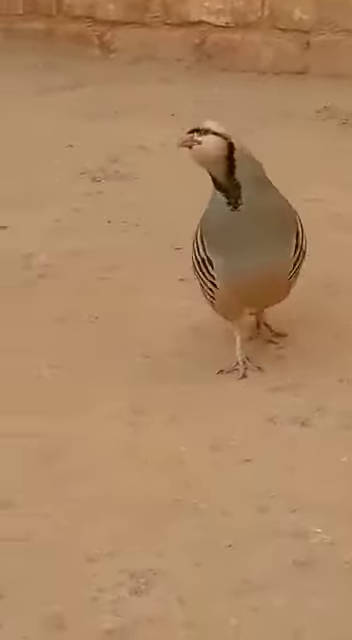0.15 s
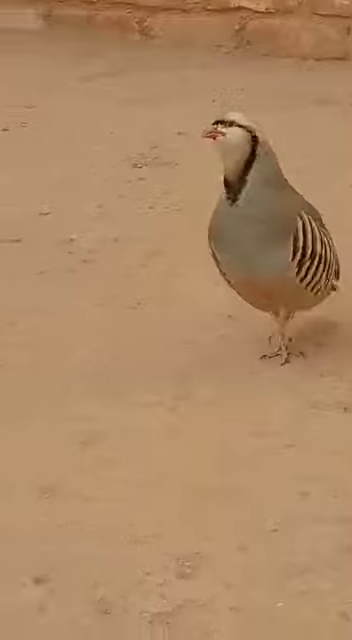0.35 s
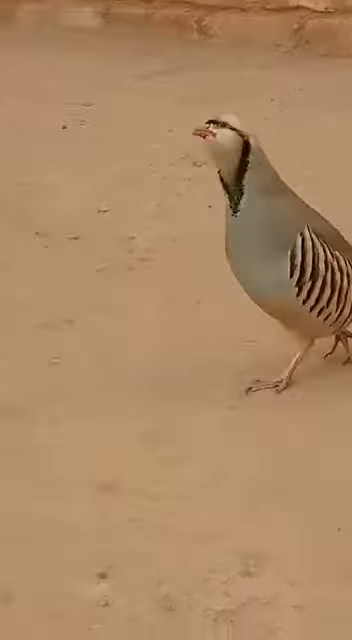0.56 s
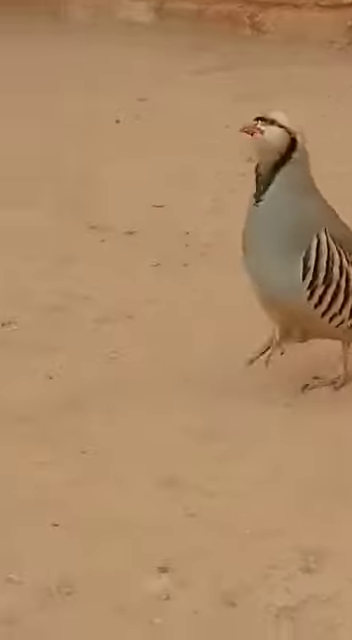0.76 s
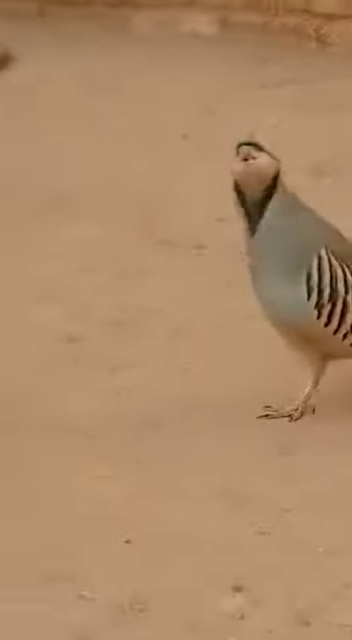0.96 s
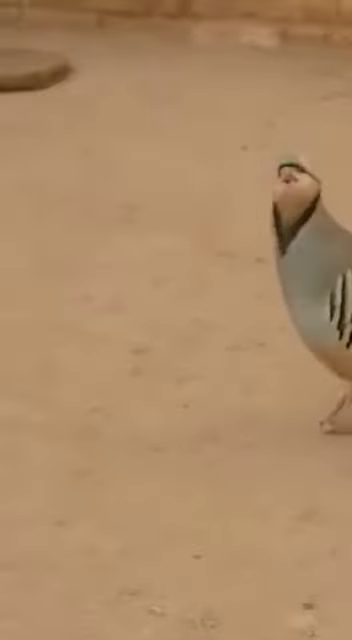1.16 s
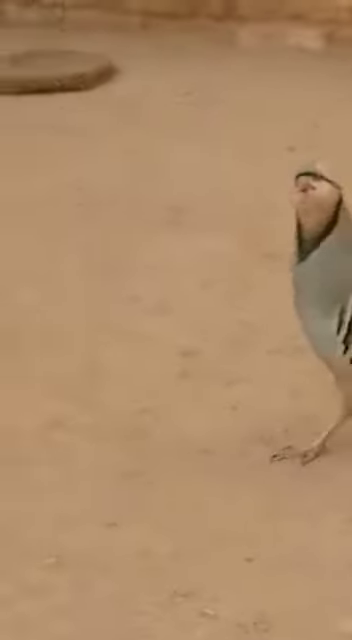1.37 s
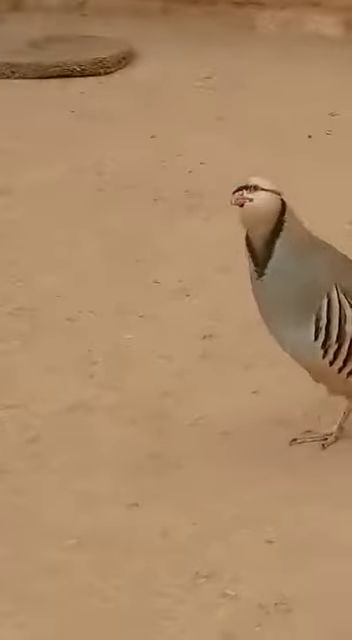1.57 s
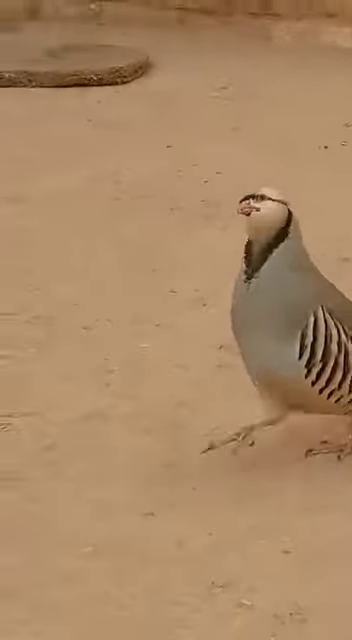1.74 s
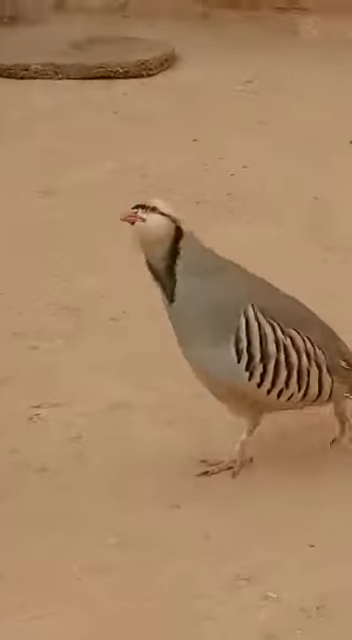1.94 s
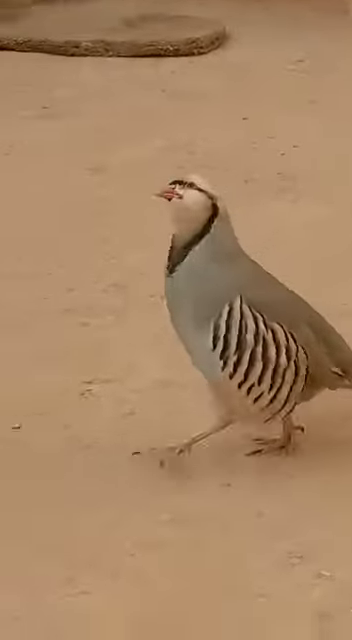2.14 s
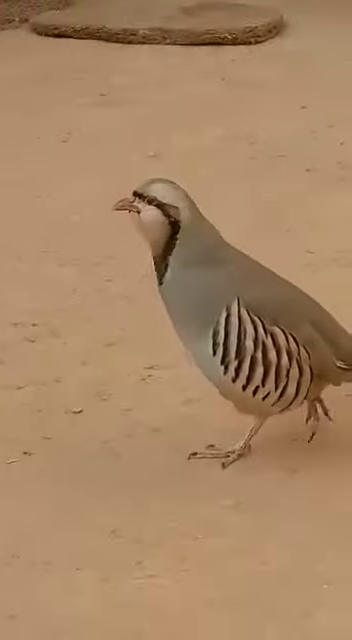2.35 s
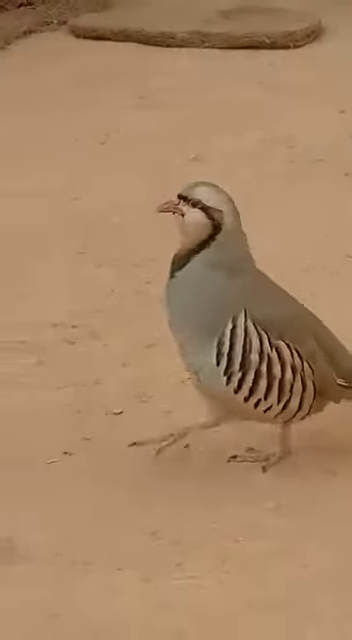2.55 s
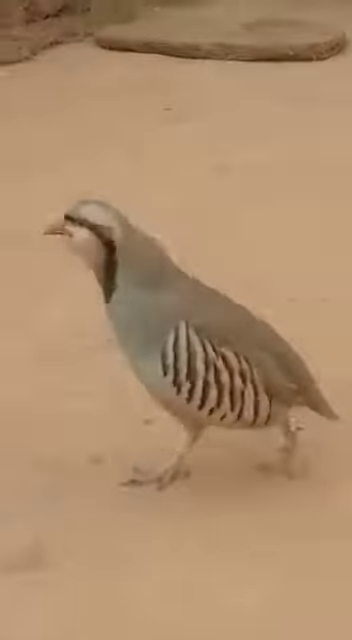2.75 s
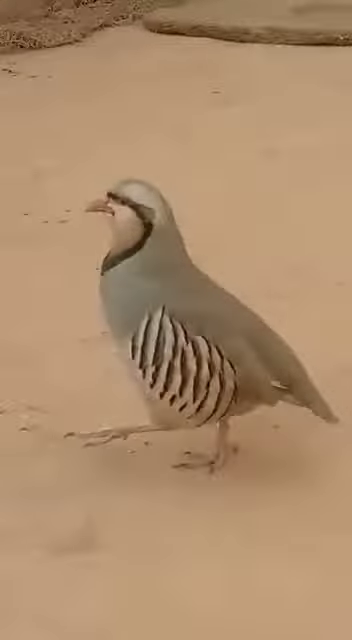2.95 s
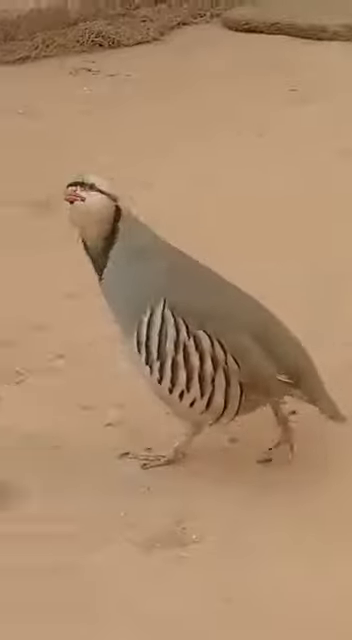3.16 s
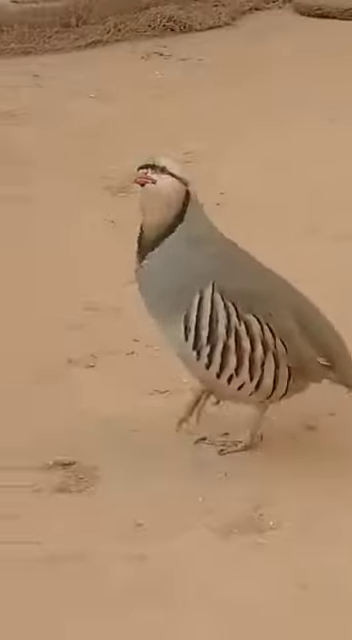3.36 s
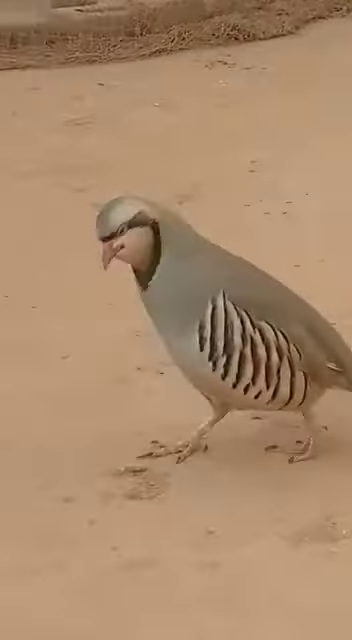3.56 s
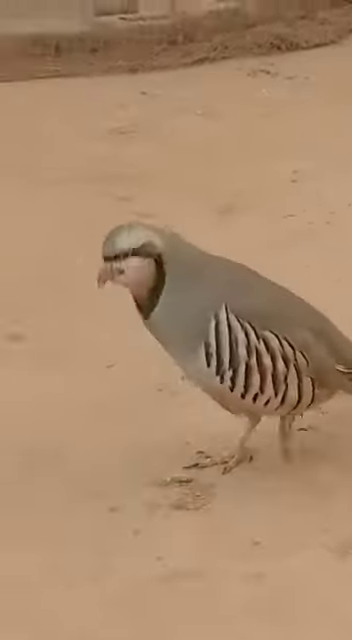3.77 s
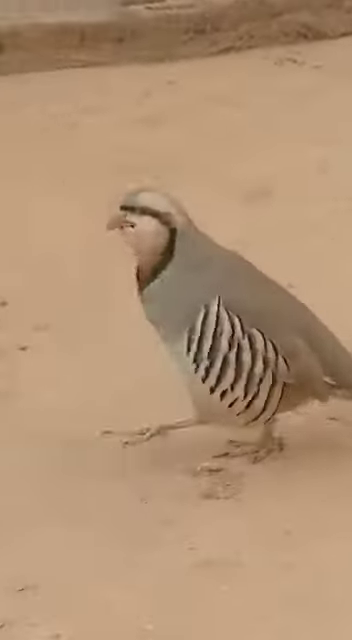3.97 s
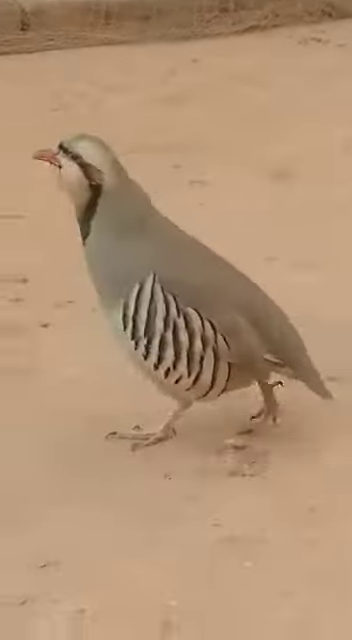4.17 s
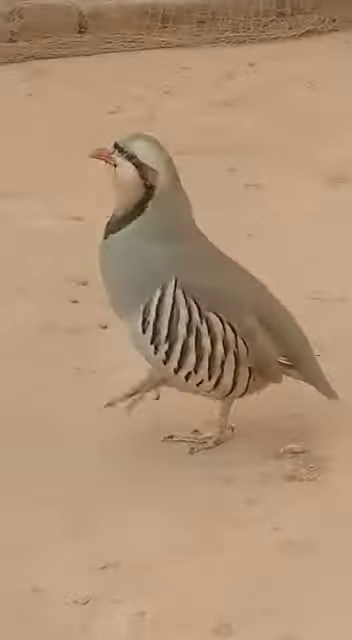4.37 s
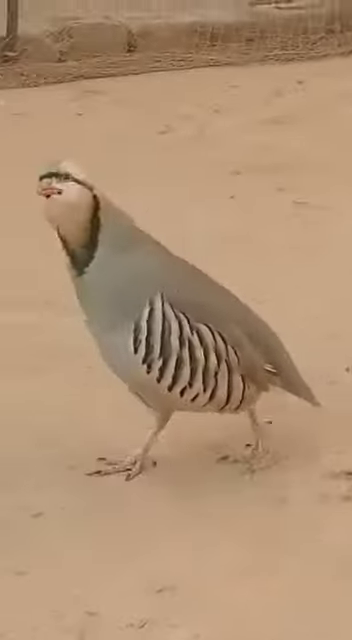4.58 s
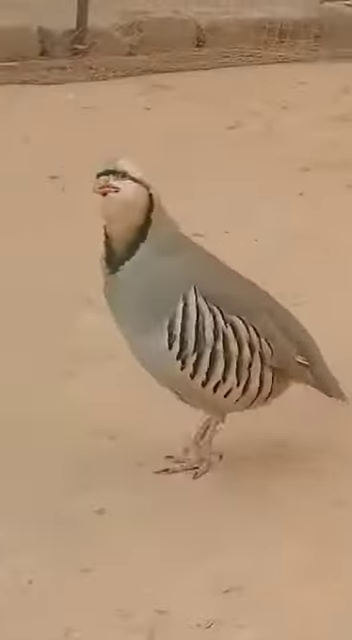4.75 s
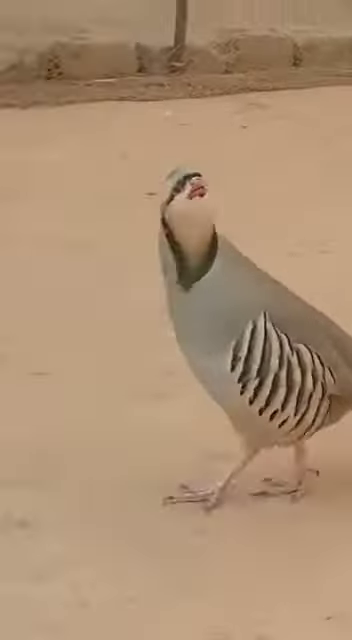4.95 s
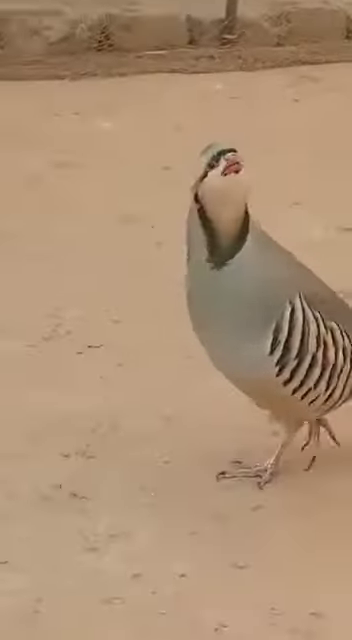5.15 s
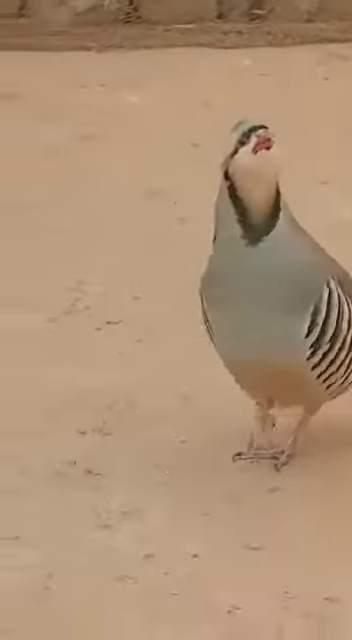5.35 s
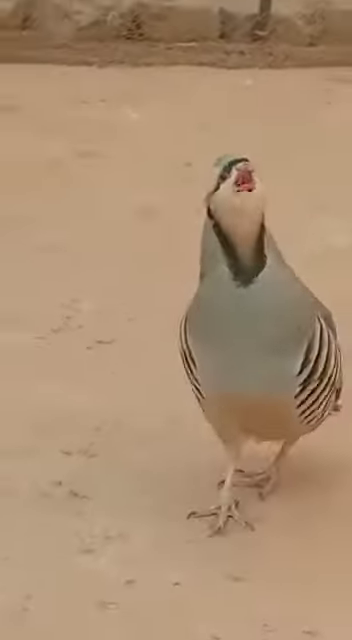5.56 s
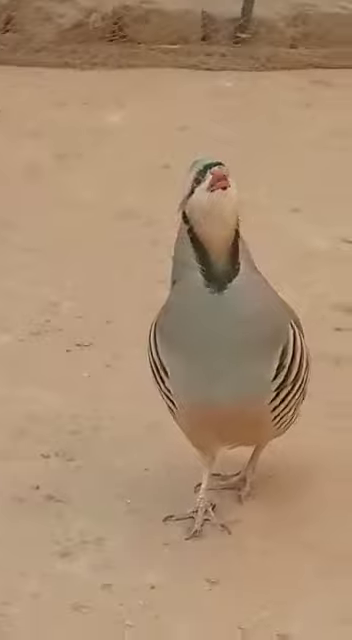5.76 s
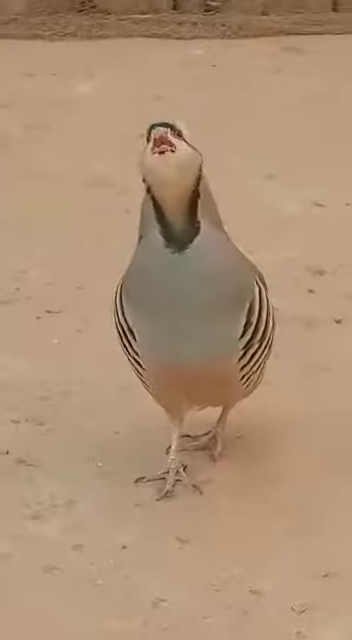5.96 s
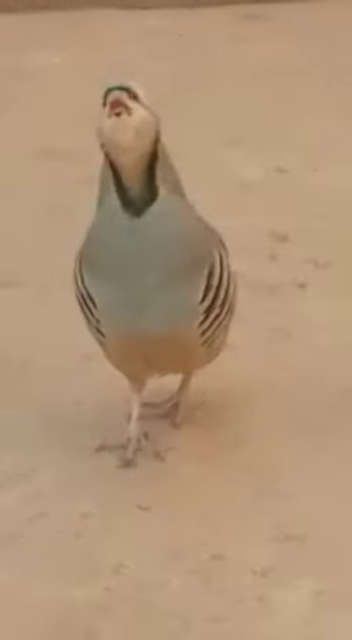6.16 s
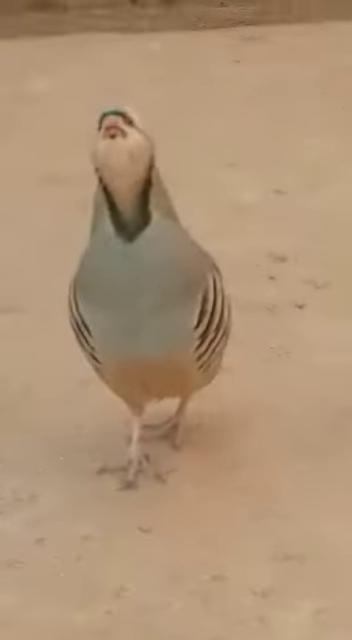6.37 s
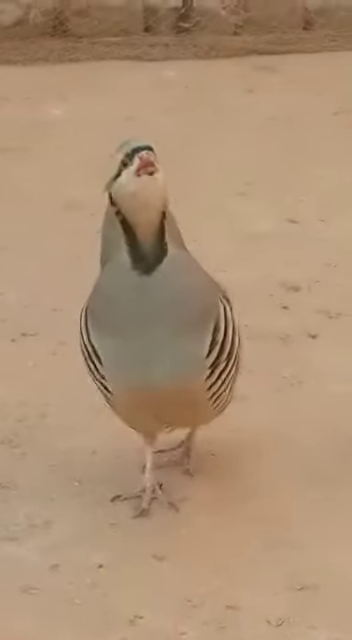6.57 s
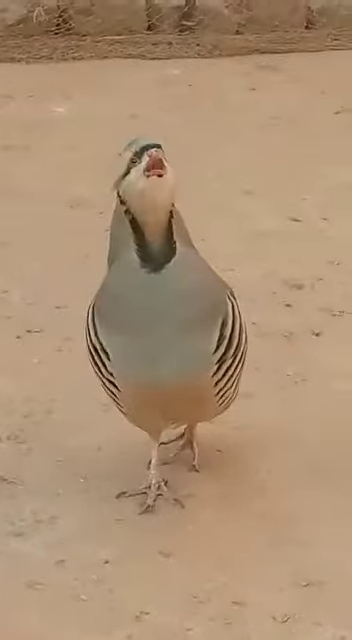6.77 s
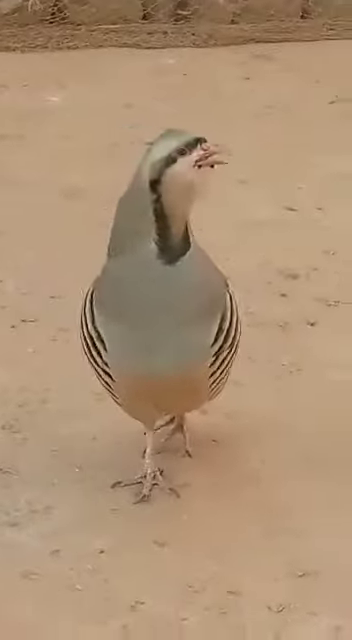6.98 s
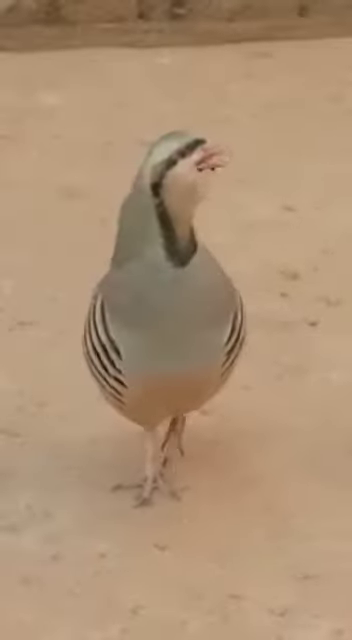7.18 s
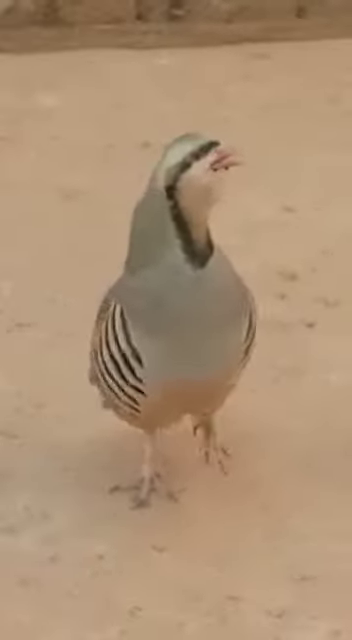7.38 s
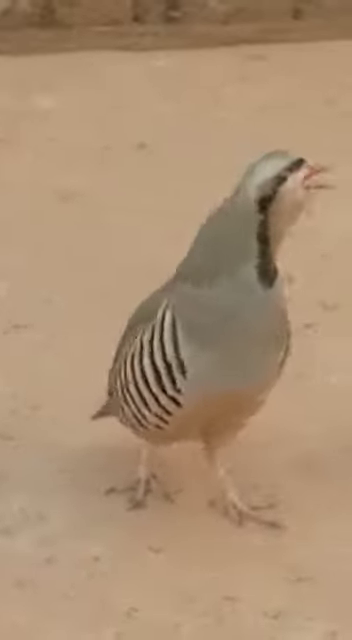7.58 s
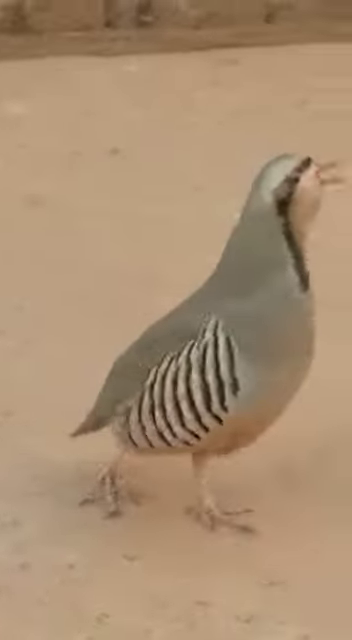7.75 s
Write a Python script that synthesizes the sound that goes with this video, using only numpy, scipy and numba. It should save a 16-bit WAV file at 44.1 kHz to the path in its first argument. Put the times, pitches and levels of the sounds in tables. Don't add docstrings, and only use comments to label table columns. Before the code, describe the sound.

Rasping bird squawks give way to sparse sharp clucks that quicken into a loud, harsh volley, with flockmates peeping and clucking farther off.

```python
import sys
import numpy as np
from scipy import signal
from scipy.io import wavfile
from scipy.ndimage import uniform_filter1d
from numba import njit

SR = 44100
rng = np.random.default_rng(int(sys.argv[2]) if len(sys.argv) > 2 else 0)


def level_to_linear(level):
    exponent = np.asarray(level, float) / 20
    return 10 ** exponent


def wav_out(sig):
    wavfile.write(sys.argv[1], SR, np.round(np.clip(np.atleast_2d(sig).T, -1, 1) * 32767).astype(np.int16))


N = 344862


def level(x, db):
    return x * level_to_linear(db) / np.sqrt(np.mean(x ** 2) + 1e-20)


@njit
def svf(x, hz, width):
    y, b, l, g, k, last = np.empty(len(x)), 0., 0., 0., 0., 0.
    for i in range(len(x)):
        if hz[i] != last:
            g, k, last = np.tan(np.pi * hz[i] / SR), width / hz[i], hz[i]
        v = (b + g * (x[i] - l)) / (1 + g * (g + k))
        b, l, y[i] = 2 * v - b, l + 2 * g * v, k * v
    return y


def ring(x, hz, width, count=2):
    for _ in range(count):
        x = svf(x, hz + np.zeros(len(x)), 1. * width)
    return x


def add(out, x, s):
    i = int(s * SR)
    out[i:i + len(x)] += x[:N - i]


def read(table, s):
    return [np.interp(s, np.array(table)[:, 0], c) for c in np.transpose(table)[1:]]


def section(table, fade):
    s, *columns = np.transpose(table)
    t = np.arange(s[0] - fade, s[-1] + fade, 1 / SR)
    edge = np.clip(np.minimum(t - t[0], t[-1] - t) / (2 * fade), 0, 1)
    return t[0], edge, [np.interp(t, s, c) for c in columns]


def notes(table, shape):
    share, start_db, end_db = shape
    share = np.clip(share, .05, .95)
    rows = []
    for s, length, db, start_hz, end_hz in table:
        peak_hz = start_hz + share * (end_hz - start_hz)
        rows.append([(s, start_hz, db + start_db),
                     (s + share * length, peak_hz, db),
                     (s + length, end_hz, db + end_db)])
    return rows


def shake(count, seconds):
    k = int(seconds * SR)
    slow = uniform_filter1d(uniform_filter1d(rng.standard_normal((2, count)), k), k)
    return 1.5 * np.tanh(slow / np.std(slow) / 1.5)


def walk(rate):
    k = int(SR / rate)
    return uniform_filter1d(np.repeat(rng.standard_normal(N // k + 1), k)[:N], k)


def syrinx(hz, rough, group, weak_db, jitter=.1, shimmer_db=5.0, breath=.45):
    n = len(hz)
    cycles = np.cumsum(hz) / SR
    k = np.arange(1, int(cycles[-1]))
    chance = np.clip(rng.standard_normal((n, 3)), -2, 2)
    rough, weak_db = rough + np.zeros(n), weak_db + np.zeros(n)
    when = np.searchsorted(cycles, k)
    moved = k + rough[when] * jitter * group * chance[k // group, 0]
    at = np.interp(moved, cycles, np.arange(n))
    size = level_to_linear(np.where(k % group, weak_db[when], 0) + rough[when] * shimmer_db * chance[k, 1])
    taps = np.floor(at).astype(int)[:, None] + np.arange(-7, 9)
    gap = taps - at[:, None]
    shape = size[:, None] * np.sinc(.8 * gap) * np.cos(np.pi * gap / 18) ** 2
    pulses = np.bincount(np.clip(taps, 0, n - 1).ravel(), shape.ravel(), n)
    return level(pulses - pulses.mean(), 0) + rough * breath * chance[:, 2]


def clucks(table, pitch, rough, low_db, mid_db, top_db, crest_db, attack, pipe=0.87, low_width=350,
           beak_width=600, chest_hz=480, neck=None):
    neck_spread, top_spread_db = .04, 3.5
    beak_drop, flutter_db, flutter_s = .4, 2.6, .004
    out = np.zeros(N)
    for s, db, pitch_hz, beak_hz, beak_db, length in table:
        u = np.arange(0, 1.4, 1 / (np.clip(length, .015, .1) * SR))
        effort = np.clip((db + 17) / 5, 0, 1)
        posture = 1 + neck_spread * rng.uniform(-2.0, 1)
        shut = np.clip((beak_hz - 4100) / 1200, 0, 1)
        hz = pitch_hz * np.interp(u, *np.transpose(pitch))
        src = syrinx(hz, rough + .05 * effort, group=2, weak_db=-9 * effort * np.clip(3 * u, 0, 1))

        if neck:
            pipe_hz = read(neck, s)[2] * (1 + 0.27 * shut * np.exp(-u / 0.28))
        else:
            pipe_hz = pipe * posture * (1520 - 400 * shut ** 2)
        voice = level(ring(src, pipe_hz * (1.05 - 0.14 * u), low_width * (1 + 0.9 * shut), count=3), 0)
        voice += level(ring(src, chest_hz, 330), low_db - 4.5 + 5 * shut) * (0.3 + 0.8 * u)
        voice += level(ring(src, 2.0 * chest_hz, 130), low_db - 7.5) * (1 - shut)

        opening = beak_drop * shut * np.clip((db + 19) / 5, 0, 1) * np.exp(-u / .3)
        moving_hz = beak_hz * (1.015 - .025 * u + opening)
        beak = level(ring(src, moving_hz, beak_width * (1 + 1.2 * shut), count=3), 0)
        beak -= level(ring(src, 2273, 1990, count=3), mid_db + 2.5 + 13 * shut) * (1.3 - 0.78 * u)
        beak += level(ring(src, beak_hz + 1050, 1300), top_db - 9.5) * (1 - shut)
        beak -= level(ring(src, beak_hz + 2550, 1.81 * beak_width, count=3), top_db - 6 * shut)
        beak += level(ring(src, beak_hz + 3900, 1500), top_db - 24)
        top = top_db + 5 * shut + top_spread_db * rng.uniform(-1, 1, 3)
        beak -= level(ring(src, 10000, 1400), top[0] - 22)
        beak += level(ring(src, 12100, 1800), top[1] - 30)
        beak -= level(ring(src, 14500, 4000), top[2] - 24)

        flutter = level_to_linear(flutter_db * shake(len(u), flutter_s))
        rise = np.clip(u / (attack + 0.31 * shut), 0, 1) ** 0.84
        swell = rise * np.clip((1.4 - u) / 0.92, 0, 1) ** 1.2
        call = voice * flutter[0] + level_to_linear(beak_db + 7.5) * beak * flutter[1]
        add(out, call * swell * level_to_linear(db + crest_db), s - .001)
    return out


# t/s, peak level/dB, pitch f/Hz, beak brightness level/dB
NEAR_CLUCKS = [(0.371, -21, 561.4, -7), (1.38, -18.5, 522, -5.5), (2.109, -20, 523, -5),
               (2.471, -18.5, 526.3, -6.5), (2.77, -36.5, 559.5, -2.5), (3.397, -18.5, 511, -5.5),
               (4.028, -19, 580, -9), (4.431, -21, 499, -5), (4.776, -17.5, 425, -7.5),
               (4.946, -17, 456.5, -9), (5.094, -19.5, 495.3, -2), (5.203, -24, 447, -8.5),
               (5.355, -14.5, 462, -11), (5.498, -13.5, 472, -8), (5.64, -13.5, 491.6, -3.5),
               (5.783, -11, 502.8, -8.5), (5.923, -11, 499, -5), (6.062, -12.5, 484, 0),
               (6.203, -9.5, 508.2, -5), (6.339, -13, 497, 0), (6.676, -13, 509.7, 0.5),
               (6.988, -13, 536.2, -1), (7.392, -11.5, 510, -5), (7.53, -13.5, 510, 0)]
# t/s, peak level/dB, pitch f/Hz, beak level/dB, length t/s
HELD_CLUCKS = [
    (6.477, -12.5, 505, 0.5, 0.056),
    (6.812, -14, 525, -0.2, 0.083),
    (7.223, -15, 400, -2, 0.032),
    (7.116, -15.5, 505, 1, 0.037),
]
FALLING_CLUCKS = [
    (4.743, -22.5, 606, -14.5, 0.033),
    (6.513, -17, 500.6, -1.5, 0.033),
    (6.845, -17.5, 493.5, 1.5, 0.028),
    (7.247, -14, 486.3, -5, 0.03),
    (7.643, -17, 485.8, -1, 0.05),
]
# t/s, beak resonance f/Hz, call length t/s, windpipe f/Hz
NEAR_POSTURE = [(.37, 5360, .034, 1230), (1.38, 5050, .031, 1240), (2.109, 5160, .029, 1073),
                (2.471, 5150, .029, 1070), (2.77, 5000, .03, 1090), (3.397, 5200, .03, 1065),
                (4.028, 5570, .033, 1110), (4.431, 5210, .029, 1175), (4.743, 4740, .03, 1264),
                (4.777, 4810, .03, 1230), (4.946, 4930, .03, 1330), (5.094, 4530, .03, 1316),
                (5.203, 4640, .03, 1320), (5.356, 4680, .03, 1474), (5.497, 4280, .034, 1490),
                (5.64, 3980, .036, 1480), (5.783, 4095, .035, 1500), (5.923, 4035, .035, 1525),
                (6.064, 3895, .034, 1470), (6.203, 3916, .034, 1470), (6.339, 3950, .034, 1440),
                (6.477, 3966, .034, 1395), (6.513, 3820, .034, 1400), (6.674, 3865, .034, 1420),
                (6.81, 3850, .034, 1422), (6.845, 3960, .034, 1424), (6.988, 3920, .034, 1495),
                (7.115, 4030, .034, 1487), (7.223, 3960, .034, 1414), (7.247, 4010, .034, 1430),
                (7.392, 3993, .034, 1500), (7.53, 3940, .034, 1447), (7.643, 3920, .05, 1346)]
FALLING_PITCH = [(0, 1.2), (.2, 1.07), (.65, 1.01), (1.3, .72)]
STEADY_PITCH = [(0, 1.06), (.3, 1.05), (1.4, 1.01)]


def near_bird():
    falling, held = [], []
    for s, db, hz, beak_db in NEAR_CLUCKS:
        beak_hz, length, _ = read(NEAR_POSTURE, s)
        falling.append((s, db, hz, beak_hz, beak_db, length))
    for rows, table in ((falling, FALLING_CLUCKS), (held, HELD_CLUCKS)):
        for s, db, hz, beak_db, length in table:
            rows.append((s, db, hz, read(NEAR_POSTURE, s)[0], beak_db, length))
    out = np.zeros(N)
    for rows, pitch in ((falling, FALLING_PITCH), (held, STEADY_PITCH)):
        out += clucks(rows, pitch, .24, -8.5, -23.0, -13.0, -16.5, 0.27, neck=NEAR_POSTURE)
    return out


# f/Hz, width f/Hz, level/dB
SQUAWK_RESONANCES = [(635, 237, -3), (2096, 1370, 4.5), (2750, 2270, -1), (3220, 630, 9), (4270, 1240, 1.5),
                     (5410, 1720, -0.5), (4550, 500, -3), (6870, 1200, -19.5), (13300, 7600, -22.5)]
# t/s, length t/s, peak level/dB, from f/Hz, to f/Hz
SQUAWK_OPENINGS = [(0.036, 0.063, -28.5, 2438, 3058), (0.51, 0.031, -24.5, 3147, 3343),
                   (.55, .021, -26.5, 3350, 3249), (0.768, 0.034, -25.5, 2566, 2446),
                   (1.06, 0.032, -24, 2056, 2648), (1.533, 0.034, -24, 2147, 2712),
                   (1.801, 0.032, -23.5, 2350, 2683)]
SQUAWK_CLEAR = [(0.114, 0.017, -26.5, 2610, 2946), (0.802, 0.036, -26, 2726, 2694),
                (1.093, 0.012, -24, 2602, 2870), (1.568, 0.0097, -30, 2892, 2977),
                (1.832, 0.023, -24, 2690, 2942)]
SQUAWK_FALLS = [(0.542, 0.008, -22.5, 2915, 2506), (1.133, 0.0092, -28, 2440, 2005),
                (1.143, 0.021, -30, 1948, 2000), (1.576, 0.015, -22.5, 2950, 2495),
                (1.863, 0.016, -25, 2653, 2282)]
SQUAWK_CLOSINGS = [(0.001, 0.036, -49, 2498, 2419), (0.136, 0.085, -33.5, 2750, 2182),
                   (1.109, 0.022, -32, 2750, 2549), (7.045, 0.029, -33.5, 2302, 2352)]
SQUAWK_TRAILS = [(.571, .02, -29.5, 3158, 2893), (.84, .035, -29.5, 2503, 2092),
                 (1.591, 0.03, -26.5, 2542, 2294), (1.879, .026, -29.5, 2246, 2012),
                 (7.105, 0.09, -37.5, 2528, 2463)]
SQUAWK_BUZZES = [(1.485, 0.026, -41.5, 2458, 2702), (1.51, .023, -38.5, 2700, 3105),
                 (2.204, .016, -42.5, 2390, 2510), (2.322, .014, -43.5, 2510, 2327),
                 (2.347, 0.0092, -42.5, 2350, 2357)]


def squawks():
    buzz_rough, buzz_weak_db = .24, -14
    wander, ragged_db = .1, 3.0
    # table, (share of the length at the peak, start dB, end dB), roughness
    kinds = [(SQUAWK_OPENINGS, (0.57, -15, -0.74), .52),
             (SQUAWK_CLEAR, (0.55, -1.1, -5), .12),
             (SQUAWK_FALLS, (0.17, -8, -5), .26),
             (SQUAWK_CLOSINGS, (0.23, -17.5, -17.5), .62),
             (SQUAWK_TRAILS, (0.14, -2.5, -12.5), .62),
             (SQUAWK_BUZZES, (.6, -6, -9.5), buzz_rough)]
    parts = []
    for table, shape, rough in kinds:
        for note in notes(table, shape):
            parts.append([point + (rough,) for point in note])
    parts.sort()
    s, hz, db, rough = np.concatenate(parts).T
    s = np.maximum.accumulate(s)
    t = np.arange(int(s[-1] * SR) + 400) / SR
    weak_db = np.interp(t, s, np.where(rough == buzz_rough, buzz_weak_db, -1.5 - 14 * rough))
    rough = np.interp(t, s, rough)
    pitch = np.interp(t, s, hz) * (1 + wander * rough * shake(len(t), .006)[0])
    src = syrinx(pitch, rough, group=3, weak_db=weak_db)
    voice = sum((-1) ** k * level_to_linear(g) * ring(src, f, w) for k, (f, w, g) in enumerate(SQUAWK_RESONANCES))
    voice /= np.sqrt(uniform_filter1d(voice ** 2, 500) + 1e-12)
    sounding = np.any([(t > part[0][0] - .001) & (t < part[-1][0] + .002) for part in parts], axis=0)
    strength_db = uniform_filter1d(np.interp(t, s, db), 90) + ragged_db * rough * shake(len(t), .003)[0]
    out = np.zeros(N)
    add(out, voice * level_to_linear(strength_db) * uniform_filter1d(1. * sounding, 70), 0)
    return out


# t/s, level/dB, rising resonance f/Hz
SCREECH_CLIMB = [
    (7.66, -31, 4230),
    (7.67, -22.5, 4240),
    (7.73, -19.5, 5360),
    (7.808, -21, 5550),
    (7.82, -20, 5510),
]
# f/Hz, width f/Hz, level/dB
SCREECH_RESONANCES = [(1180, 2300, -28.5), (2865, 540, -1.5), (3870, 680, 2), (4860, 1800, -3),
                      (6730, 1160, 0), (7730, 4000, -22)]


def screech():
    s, edge, (db, climb_hz) = section(SCREECH_CLIMB, 0.012)
    src = syrinx(np.full(len(db), 1080.), 1.1, group=2, weak_db=-2.0, shimmer_db=2.5, breath=.9)
    throat = sum((-1) ** k * level_to_linear(g) * ring(src, f, w) for k, (f, w, g) in enumerate(SCREECH_RESONANCES))
    throat += level_to_linear(7.0) * ring(src, climb_hz * (1 + 0.044 * shake(len(db), 0.0036)[0]), 520)
    throat /= np.sqrt(uniform_filter1d(throat ** 2, 150) + 1e-12)
    out = np.zeros(N)
    add(out, throat * level_to_linear(db) * edge, s)
    return out


# t/s, peak level/dB, pitch f/Hz, length t/s
HIGH_PEEPS = [(2.538, -30.5, 1316, 0.023), (2.8923, -29.5, 1160, 0.024), (3.036, -24, 1095, 0.02),
              (3.304, -29.5, 1130, 0.021), (3.719, -34.5, 1148, 0.017), (4.132, -32.5, 1180, 0.021),
              (4.527, -31.5, 1184, 0.026), (4.928, -27.5, 996, 0.025), (5.312, -32.5, 1213, 0.027),
              (5.7226, -31, 1210, 0.033)]
PEEP_RASPS = [(2.551, -32, 802, .016), (2.907, -35, 640, 0.014), (3.317, -34, 653, .015),
              (3.734, -38, 624, .016), (4.143, -29.5, 637, .018), (4.549, -34.5, 600, .02),
              (5.329, -34, 620, .016), (6.132, -28, 699, .02)]
PEEP_CONTOUR = [(0, .9), (.45, 1.01), (.8, .98), (1.3, .86)]


def peeping_bird():
    peeps, rasps = [[(s, db, hz, 4820, -10 - 0.71 * (db + 28), length) for s, db, hz, length in table]
                    for table in (HIGH_PEEPS, PEEP_RASPS)]
    out = clucks(rasps, FALLING_PITCH, .55, -10.5, -22.5, -17.5, -14.0, .15,
                 pipe=0.77, low_width=600, beak_width=1700)
    return out + clucks(peeps, PEEP_CONTOUR, .13, -58.5, -28.5, -21.0, -10.5, 0.71,
                        low_width=680, beak_width=1700)


# t/s, peak level/dB, pitch f/Hz, length t/s
FAR_CLUCKS = [(0.155, -47, 646, .05), (0.257, -51, 622, 0.038), (0.469, -48.5, 773, 0.0083),
              (0.665, -47, 773, 0.041), (.99, -48, 1151, .03), (1.209, -47.5, 727, 0.039),
              (1.298, -51, 611, 0.042), (1.639, -45.5, 659, 0.042), (1.725, -50.5, 648, 0.028),
              (1.91, -49, 665, 0.056), (2.03, -52, 765, 0.036), (2.322, -48, 739, 0.033),
              (2.761, -46, 763, 0.039), (2.985, -49.5, 524, 0.046), (3.675, -44, 699, 0.047),
              (3.804, -43, 489, 0.022), (3.839, -54.5, 505, 0.042), (4.213, -43.5, 562, 0.031),
              (4.254, -48, 463, 0.025), (4.542, -45.5, 668, 0.037), (4.619, -47, 550.6, 0.035),
              (4.651, -47.5, 452.4, 0.032), (5.018, -45, 577.5, 0.036), (5.038, -44, 491, 0.025),
              (5.227, -46.5, 578, 0.032), (6.601, -42, 701, 0.026), (6.966, -47, 521.7, 0.061)]
FAR_CONTOUR = [(0, 1.26), (0.3, 1.08), (0.7, .83), (1.3, 0.63)]
# t/s, beak resonance f/Hz, brightness level/dB
FAR_TURNING = [(0.3, 3390, -11), (2.3, 4310, -11), (2.9, 4740, -25), (3.7, 4345, -18.5), (5.0, 4740, -20),
               (6.8, 3940, -48.5)]


def far_birds():
    rows = [(s, db, hz, *read(FAR_TURNING, s), length) for s, db, hz, length in FAR_CLUCKS]
    return clucks(rows, FAR_CONTOUR, .22, -3.5, -26, -19, 0, 0.089,
                  pipe=0.71, chest_hz=425, low_width=533, beak_width=2460)


def whistles(tables, octave_db, third_db, breath_db, wobble, flutter_db):
    out = np.zeros(N)
    for table in tables:
        s, edge, (hz, db) = section(table, 0.0018)
        waver = shake(len(hz), .003)
        phase = 2 * np.pi * np.cumsum(hz * (1 + wobble * waver[0])) / SR
        tone = np.sin(phase) + level_to_linear(octave_db) * np.sin(2 * phase)
        tone += level_to_linear(third_db) * np.sin(3 * phase) * np.clip((8500 - 3 * hz) / 2000, 0, 1)
        breath = level(ring(rng.standard_normal(len(hz)), 4300, 3200, count=3), breath_db)
        add(out, (np.sqrt(2) * tone * level_to_linear(flutter_db * waver[1]) + breath) * level_to_linear(db) * edge, s)
    return out


# t/s, f/Hz, level/dB
LOUD_WHISTLE = [
    (7.07, 5070, -46),
    (7.076, 5654, -15),
    (7.087, 5745, -19.5),
    (7.092, 5905, -21),
    (7.105, 5882, -25),
    (7.165, 5934, -24),
    (7.19, 5990, -41.5),
]


def loud_whistle():
    return whistles([LOUD_WHISTLE], -36, -50, -21, .007, 3.5)


# t/s, length t/s, peak level/dB,
# from f/Hz, to f/Hz
SHORT_WHISTLES = [(.8, 0.036, -32.5, 4617, 4540), (1.092, 0.015, -29.5, 4390, 4200),
                  (.504, 0.013, -37.5, 4000, 2500), (.503, 0.0053, -38.5, 2250, 1700),
                  (.655, 0.0085, -49.5, 5440, 5450), (0.085, 0.062, -35.5, 4200, 4430),
                  (0.592, 0.066, -40.5, 3810, 3930), (1.526, .024, -36, 3800, 4300),
                  (1.565, 0.03, -34, 3400, 3920), (.515, .026, -33, 2200, 2600),
                  (.552, 0.018, -33.5, 2320, 2150), (2.236, 0.04, -40.5, 4150, 4380),
                  (1.8, 0.014, -50.5, 1750, 2250), (2.312, .01, -43.5, 4300, 2800),
                  (7.036, 0.014, -33, 7500, 7520), (7.046, 0.0403, -35.5, 6800, 6880),
                  (7.058, 0.016, -37, 2338, 2260)]
FAR_SONG = [(1.6, .06, -66.5, 3110, 2110), (4.1, 0.04, -68.5, 3200, 3120), (3.179, 0.11, -67, 2684, 2680),
            (3.551, .09, -71.5, 2740, 2770), (3.885, .12, -73, 6050, 5510), (3.96, 0.067, -72, 2990, 2950),
            (4.161, .12, -71, 3160, 3100), (4.32, .07, -71, 3300, 3320), (4.592, .03, -65.5, 3010, 3060),
            (4.681, .042, -65.5, 3590, 3290)]
# share of the length at the peak [1], start level/dB, end level/dB
WHISTLE_ENVELOPE = (0.12, -14, 0)
# t/s, f/Hz, level/dB
ARCHED_SQUEAL = [(2.203, 1490, -44), (2.22, 2540, -47.5), (2.232, 3407, -36.5), (2.25, 3620, -40.5),
                 (2.275, 3730, -36), (2.295, 3550, -36.5), (2.31, 2837, -43.5), (2.318, 1750, -43),
                 (2.33, 1495, -51.5), (2.352, 1293, -42.5)]


def small_birds():
    out = whistles([ARCHED_SQUEAL], -13.0, -18, -13, 0.009, 4.4)
    for table, wobble in ((SHORT_WHISTLES, .009), (FAR_SONG, .022)):
        out += whistles(notes(table, WHISTLE_ENVELOPE), -41.0, -64.0, -12, wobble, 4.0)
    return out


def scattered(near, whistle):
    t60_s = 0.47
    late = np.arange(int(.4 * SR)) / SR
    scatter = rng.standard_normal(len(late)) * level_to_linear(-60 * late / t60_s) * (late > .008)
    bright = level_to_linear(-8.5) * ring(whistle, 5890, 2500) + level_to_linear(-16.5) * ring(near, 6570, 4000)
    return signal.fftconvolve(bright, scatter / np.sqrt(np.sum(scatter ** 2)))[:N]


# delay t/s, level/dB
WALL_SLAPS = [
    (0.026, -8.5),
    (0.055, -10.5),
    (0.108, -14),
]


def slap_echoes(near):
    out = np.zeros(N)
    for delay, db in WALL_SLAPS:
        add(out, level_to_linear(db) * ring(near, 970, 820), delay)
    return out


@njit
def walls(x, lags, gain, damp):
    line, soft, out = np.zeros((8, 8192)), np.zeros(8), np.zeros(len(x))
    for i in range(len(x)):
        total = 0.
        for k in range(8):
            soft[k] += (1 - damp) * (gain[k] * line[k, (i - lags[k]) & 8191] - soft[k])
            total += soft[k]
        out[i] = soft[0] - soft[1] + soft[2] - soft[3] + soft[4] - soft[5] + soft[6] - soft[7]
        for k in range(8):
            line[k, i & 8191] = x[i] + soft[k] - total / 4
    return out


def yard_tail(x):
    t60_s, damp = 2.07, 0.67
    lags = rng.integers(300, 2800, 8)
    return level_to_linear(-24.5) * walls(x, lags, level_to_linear(-60 * lags / SR / t60_s), damp)


# f/Hz, level/dB per Hz
AIR_SPECTRUM = [(150, -37), (250, -19), (513, -5), (615, 1), (1240, -5.5), (2300, -23.5), (3400, -6),
                (4010, -26.5), (6190, -7), (9000, -48), (11700, -86), (19800, -120)]
# t/s, level/dB
WIND = [(0.1, -74), (0.33, -84), (0.8, -74.5), (1.37, -71.5), (1.6, -78.5), (4.55, -75), (4.75, -71.5),
        (5.18, -72.5), (5.7, -78), (6.0, -76), (6.4, -69.5), (6.75, -79.5), (7.8, -80)]
# t/s, peak level/dB, fall in dB per s
DUST = [
    (4.95, -59.5, 46),
    (5.3, -51, 36.5),
    (7.17, -64, 87.5),
    (7.798, -55, 216),
]


def air(patchy_db=4.0):
    out = 0
    spectrum_hz, spectrum_db = np.transpose(AIR_SPECTRUM)
    for hz in 280 * 2 ** np.arange(0, 5.1, 1 / 3):
        db = np.interp(np.log(hz), np.log(spectrum_hz), spectrum_db) + 10 * np.log10(hz)
        out = out + level(ring(rng.standard_normal(N), hz, hz / 4), db) * level_to_linear(patchy_db * walk(24.0))
    for hz in 2000 * 2 ** np.arange(0, 1.7, 1 / 5):
        out = out + level(ring(rng.standard_normal(N), hz, 110), 8.5) * level_to_linear(7.3 * walk(5.2))
    t = np.arange(N) / SR
    rustle = sum(level_to_linear(db - fall_db * abs(t - s)) for s, db, fall_db in DUST)
    hiss = level(ring(rng.standard_normal(N), 6000, 3950), -11.5)
    rumble = level(ring(rng.standard_normal(N), 71, 45), 0) + level(ring(rng.standard_normal(N), 134, 75), 1.0)
    gusts = level_to_linear(read(WIND, t)[0] - 4.5 + 2.6 * walk(9.0))
    hum = level_to_linear(-73) * np.sin(2 * np.pi * 62 * t) * np.clip(np.minimum(t - 6.15, 6.9 - t) / 0.085, 0, 1)
    return level(out, -64) + rumble * gusts + hiss * rustle + hum


def scene():
    harsh = squawks()
    near = near_bird() + harsh + screech()
    near = signal.sosfilt(signal.butter(4, 280, "high", fs=SR, output="sos"), near)
    peeps, far, songs, whistle = peeping_bird(), far_birds(), small_birds(), loud_whistle()
    near += whistle + scattered(near, whistle)
    to_walls = near + (level_to_linear(2.5) - 1) * harsh + level_to_linear(8.5) * peeps + level_to_linear(9.5) * far + level_to_linear(6.0) * songs
    out = near + peeps + far + songs + yard_tail(to_walls) + air() + slap_echoes(near)
    return out[None]


def denoise(x, strength=1.2, deepest_db=-10):
    _, _, z = signal.stft(x, nperseg=512)
    power = uniform_filter1d(uniform_filter1d(abs(z) ** 2, 11, axis=1), 3, axis=0)
    noise = np.percentile(power, 15, axis=1, keepdims=True)
    gain = np.clip(1 - strength * noise / (power + 1e-18), level_to_linear(deepest_db), 1)
    gain[:4] = 1
    return signal.istft(z * gain, nperseg=512)[1][:N]


def roll_off(x):
    return signal.sosfilt(signal.butter(12, 17130, fs=SR, output="sos"), x)


# f/Hz, width f/Hz, boost level/dB
CAPSULE = [
    (15600, 1250, 18),
]


def record(dry):
    limit = .55
    x = dry[0] + sum(level_to_linear(db) * ring(dry[0], hz, width) for hz, width, db in CAPSULE)
    x = limit * np.tanh(x / limit)
    x = signal.sosfilt(signal.butter(2, 50, "high", fs=SR, output="sos"), x)
    x = signal.sosfilt(signal.ellip(8, .3, 60, 16050, fs=SR, output="sos"), x)
    return roll_off(denoise(x)[None])


dry = scene()
out = record(dry)
wav_out(out)
```